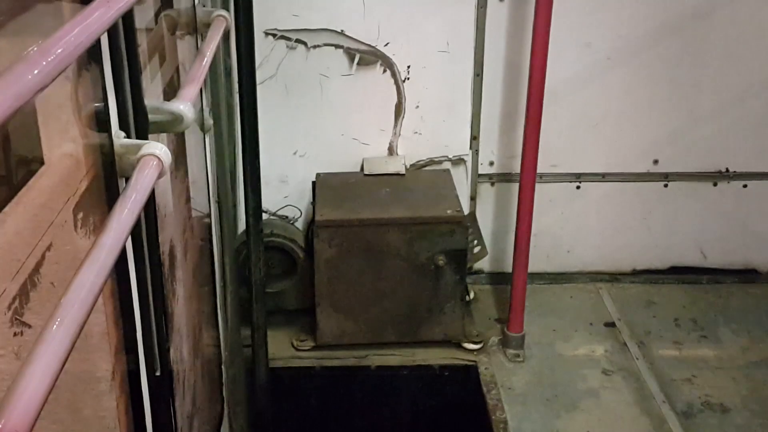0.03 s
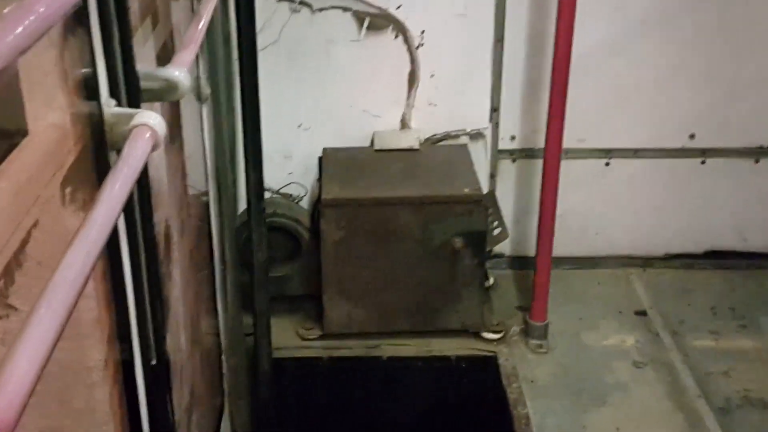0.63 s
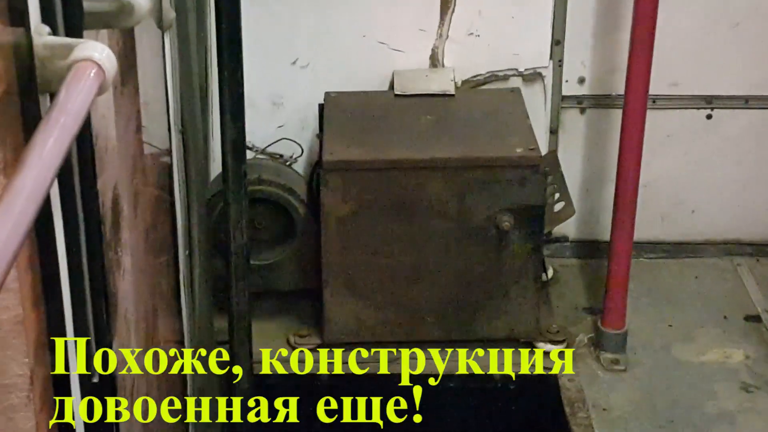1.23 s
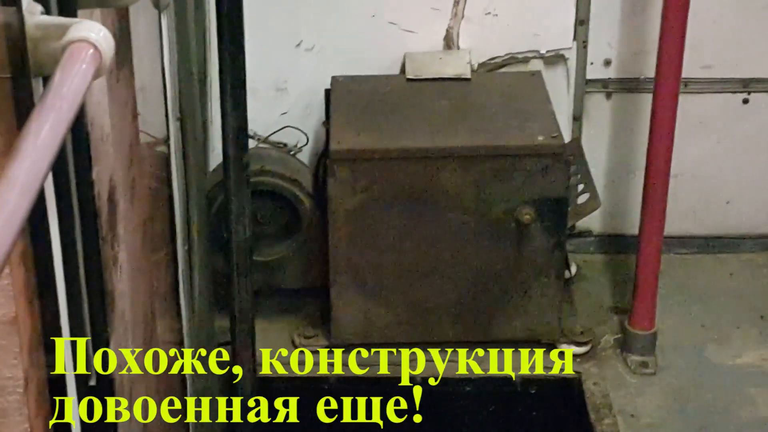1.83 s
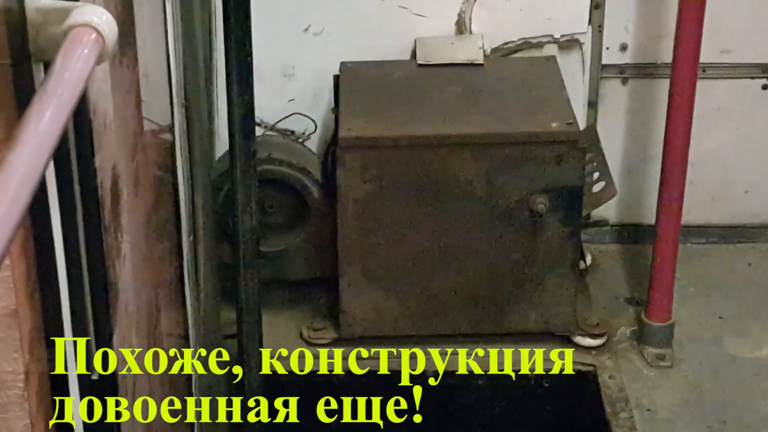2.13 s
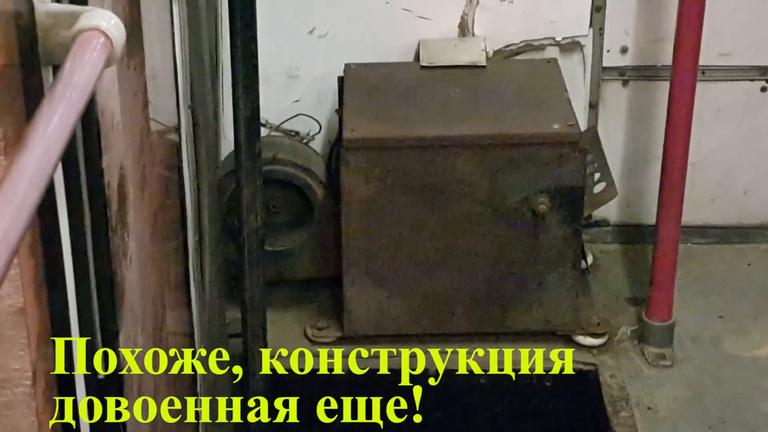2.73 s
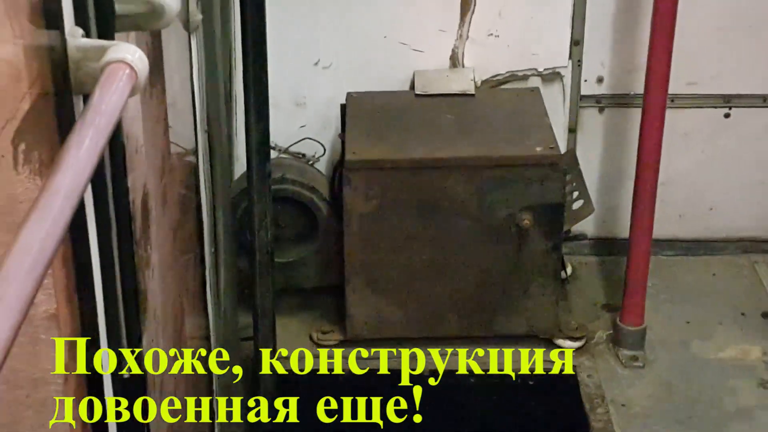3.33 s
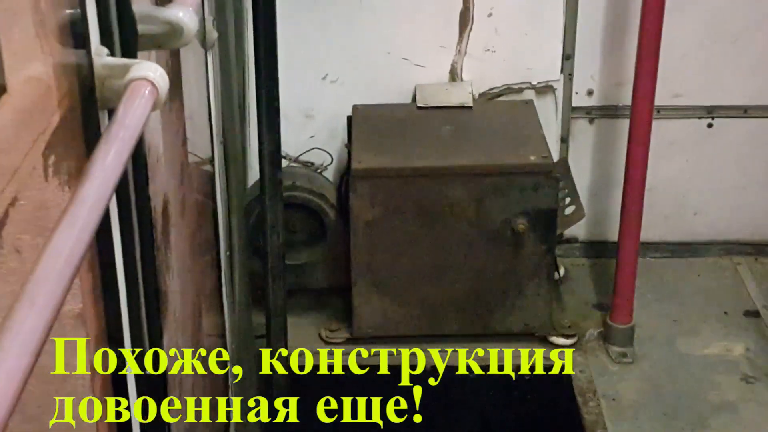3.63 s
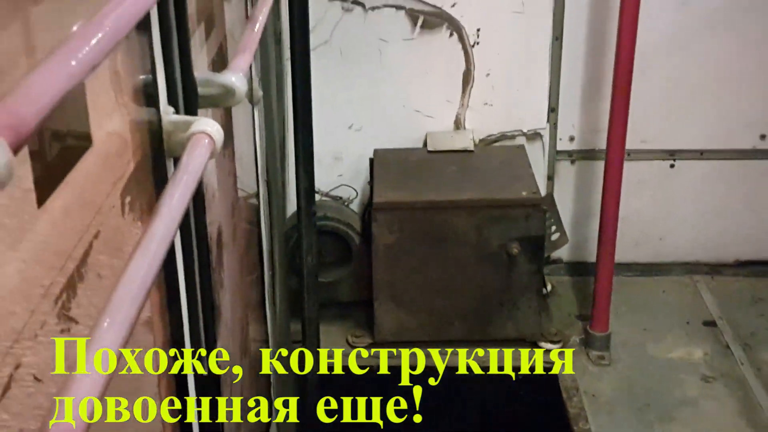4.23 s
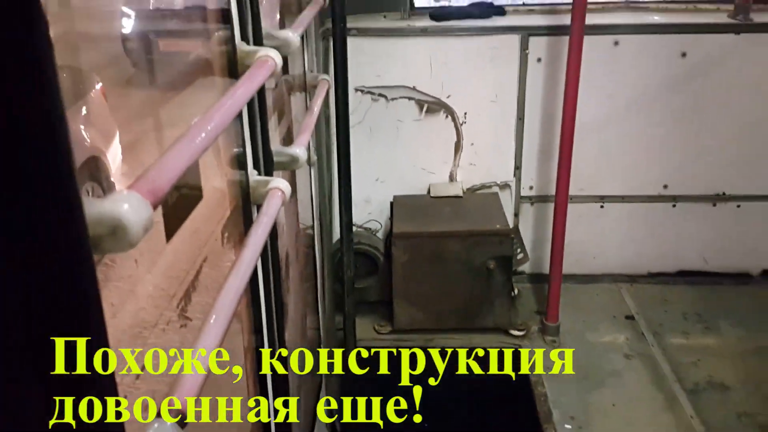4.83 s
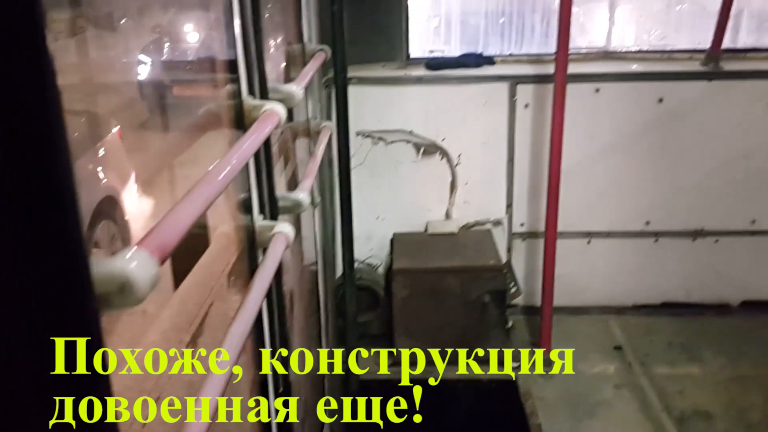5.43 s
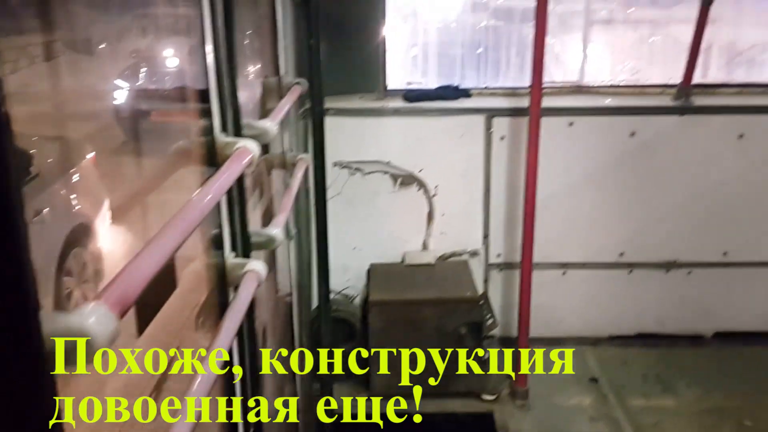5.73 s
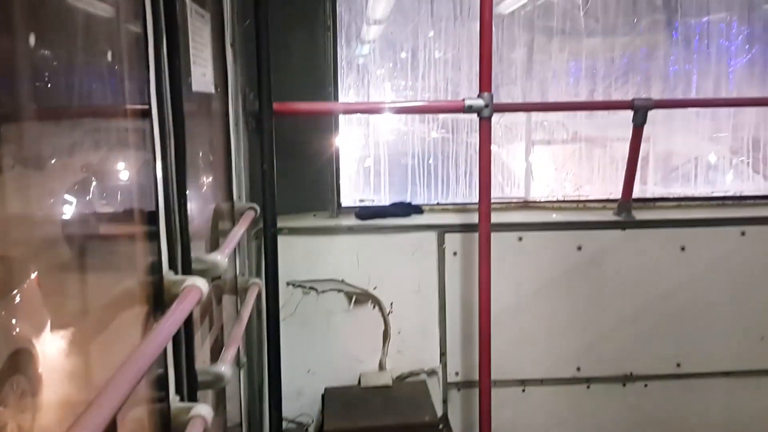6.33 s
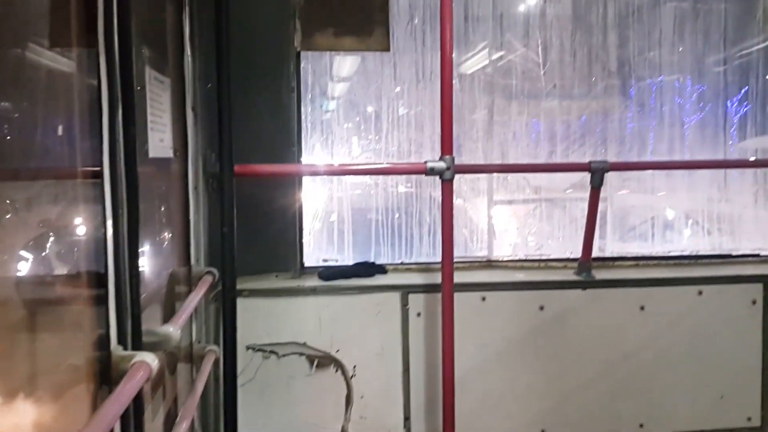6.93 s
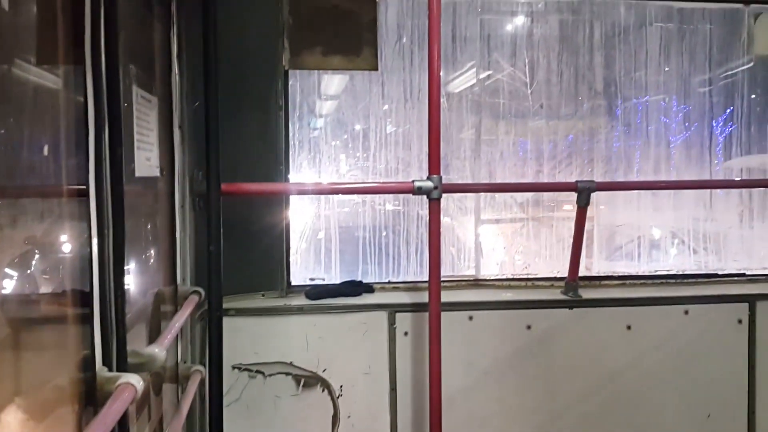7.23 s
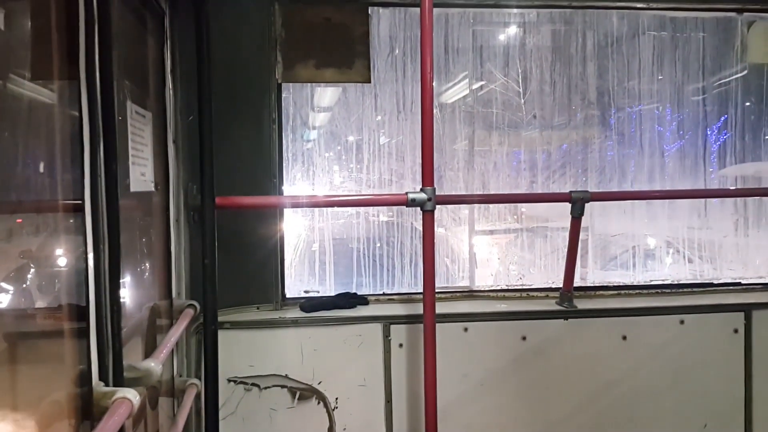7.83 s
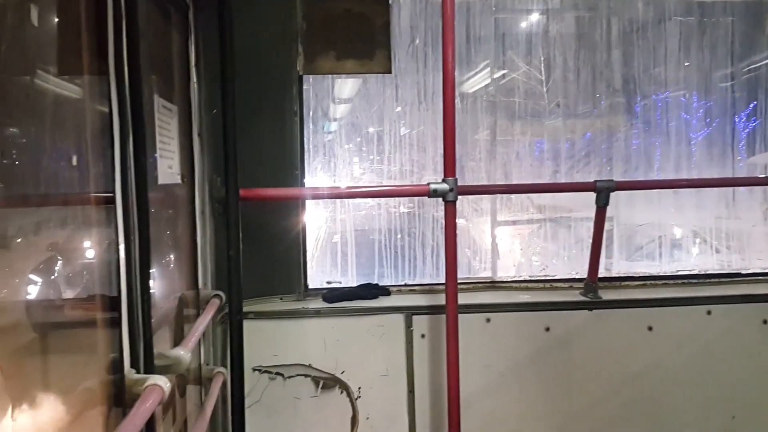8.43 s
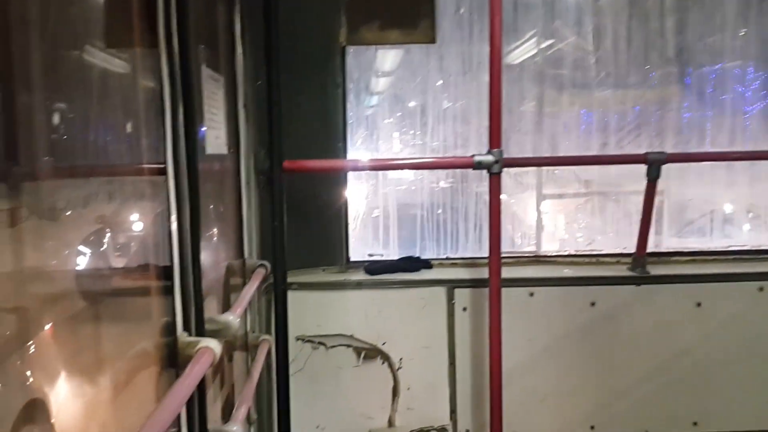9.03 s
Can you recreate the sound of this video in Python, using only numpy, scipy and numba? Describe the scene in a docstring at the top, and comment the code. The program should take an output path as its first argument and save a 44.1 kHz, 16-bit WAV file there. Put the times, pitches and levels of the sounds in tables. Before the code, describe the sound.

A bus idles with a throbbing diesel boom, heard from inside, while a floor heater fan hums and blows air.

```python
"""A throbbing diesel boom fades in: a bus idles, heard from inside, and its uneven firings ring the
exhaust pipe and the cabin air and buzz loose panels. Over the cabin rumble a floor heater runs: its fan
motor hums, whirs once a turn and blows air through a steel box. Loose sheet metal gives a few light
rattles. The hand-held phone turns from heater to window, and its gain control ducks on the throbs."""
import sys
import numpy as np
from scipy import signal
from scipy.fft import rfft, irfft
from scipy.io import wavfile
from scipy.ndimage import uniform_filter1d
from numba import njit

SR = 44100
rng = np.random.default_rng(int(sys.argv[2]) if len(sys.argv) > 2 else 0)


def waveform_to_disk(signal):
    """Save audio, clipped to [-1, 1], as 16-bit WAV at the path in sys.argv[1]."""
    frames = np.transpose(np.atleast_2d(signal))
    scaled = np.clip(frames, -1, 1) * 32767
    samples = np.round(scaled).astype(np.int16)
    wavfile.write(sys.argv[1], SR, samples)


N = 404397
TIME = np.arange(N) / SR
FREQS = np.maximum(np.fft.rfftfreq(N, 1 / SR), 1)

# idle speed: (time [s], four-stroke cycle rate [Hz])
IDLE_SPEED = [(0, 7.148), (2.6, 7.153), (3.6, 7.169), (5.8, 7.153), (7.8, 7.117), (9.17, 7.123)]
# the uneven firings: (place in the cycle [0-1], exhaust strength [dB], knock strength [dB])
CYLINDERS = [(.12, -1.2, -2), (.456, 0, -6), (.668, -1, 1), (.932, -2.5, -2)]
# two close air modes of the cabin: (pitch [Hz], width [Hz], relative level [dB])
AIR_MODES = [(157.6, 9, 0), (176.9, 9, -2.6)]
# the engine rocks on its mounts: (rate [per cycle], swing [dB], place of the crest in the cycle [0-1])
ROCKING = [(1, 1.8, .28), (2, 1.5, .18)]
# the boom eases for a moment: (time [s], half length [s], depth [dB])
BOOM_LULLS = [(.85, 0.33, -3.5), (3.856, 0.32, -4), (6.8, 0.45, -3)]
# body panels rung by the firings: (pitch [Hz], width [Hz], relative level [dB])
PANEL_MODES = [(192.54, 2.14, 5), (228.6, 7.6, 5), (285.5, 18, -4), (531.8, 10.1, 2.5), (553, 7.2, 1)]
# the engine shakes the body: (order [x cycle rate], level [dB])
SHAKE_ORDERS = [(4, -55), (6, -59), (9, -48.5), (10, -38.5), (12, -33), (14, -40.5), (16, -30)]
# fan motor hum: (order [x shaft rate], level [dB])
FAN_ORDERS = [(1, -52), (5, -36), (6, -32.5), (7, -42), (8, -64), (13, -43.5), (14, -46), (28, -64.5),
              (30, -57), (31, -62.5), (36, -49), (56, -54)]
# rushing air: (frequency [Hz], left density [dB/Hz], right density [dB/Hz])
AIR_SPECTRUM = [(60, -96, -93.5), (330, -54, -58.5), (700, -66, -61.5), (900, -61.5, -64.5),
                (1190, -62, -58), (1610, -66, -61.5), (1850, -67.5, -67), (2500, -72, -65.5),
                (3440, -78, -72.5), (4920, -77.5, -78), (5700, -78.5, -76), (6600, -92, -78.5),
                (7700, -91, -91.5), (11000, -95, -92), (15500, -99, -99)]
# resonances and dips of the heater box and its corner:
# (centre [Hz], width [Hz], lift facing the heater [dB], lift facing the window [dB])
BOX_RESONANCES = [(825, 230, -3.5, 2.5), (1160, 120, 1.5, -1), (1350, 200, 1.5, -2.5), (1700, 70, 2, 2),
                  (2262, 88, 6, 2), (2460, 53, -3.5, -1), (3090, 51, -2, 4), (4470, 130, 5, -0.5),
                  (4900, 540, -2.5, -3), (7160, 200, 4, 5.5), (11600, 1400, -1, 2)]
# cabin rumble: (frequency [Hz], density [dB/Hz])
RUMBLE_SPECTRUM = [(15, -76.5), (50, -72), (80, -53.5), (125, -54), (162, -39.5), (205, -42.5), (250, -52),
                   (300, -49.5), (360, -61.5), (430, -57.5), (510, -52), (610, -59), (760, -57),
                   (950, -70.5)]
# tones of the running bus: (pitch [Hz], level [dB], lift facing the window [dB], pitch wander [ratio])
BUS_TONES = [(35.6, -46.5, 0.5, .002), (826, -45.5, 4.5, .0012), (1944, -46.5, -4.5, .003)]
# light rattles of loose sheet metal: (time [s], half length [s], drive [dB], ring pitch [Hz])
RATTLES = [(2.238, 0.021, -34, 4000), (2.662, 0.018, -43, 4020), (2.8, 0.016, -43, 4500),
           (6.439, 0.013, -39, 4580)]
# where the phone points: (time [s], aim [0 heater - 1 window])
PHONE_AIM = [(4.4, 0.2), (6.8, 1)]


def undb(db):
    """Decibels to gain."""
    return 10 ** (np.asarray(db) / 20)


def level(x, db):
    """Scale to an rms level."""
    return x * undb(db) / np.sqrt(np.mean(x ** 2))


def drift(rate_hz):
    """Smooth random movement with a spread of 1."""
    return level(irfft(rfft(rng.standard_normal(N)) * np.exp(-(FREQS / rate_hz) ** 2), N), 0)


def bump(centre_s, half_s):
    """A smooth rise and fall, 1 at its centre."""
    return np.exp(-((TIME - centre_s) / half_s) ** 2)


def ring(x, hz, width_hz):
    """A resonance with gain 1 at its centre."""
    return signal.lfilter(*signal.iirpeak(hz, hz / width_hz, fs=SR), x)


def curve(hz, db):
    """An EQ curve: points joined on a log-frequency axis."""
    return np.interp(np.log(FREQS), np.log(hz), db)


def colour(white, db):
    """Give unit white noise a density in dB per Hz."""
    return irfft(rfft(white) * undb(db), N) * np.sqrt(SR / 2)


def tone(turns, hz, db, diffuse_hz=1100):
    """A stereo sine whose phase spreads wider with pitch, up to diffuse_hz."""
    apart = min(hz / diffuse_hz, 1) ** 2 * rng.choice([-1, 1]) * np.pi / 4
    phase = 2 * np.pi * (turns + rng.random())
    return undb(db) * np.sqrt(2) * np.sin(phase + np.array([[apart], [-apart]]))


def pan(x, db):
    """Lean to the left by db."""
    return x * undb(np.array([[db], [-db]]) / 2)


def firings(cycle, strength_db, scatter_db, jitter_s):
    """One pulse per cylinder per cycle, each a little off in strength and time."""
    place = np.array(CYLINDERS)[:, 0]
    cycles = np.arange(int(cycle[-1]) + 1)
    chance = rng.standard_normal((len(cycles) * len(place), 2))
    due_s = np.interp((cycles[:, None] + place).ravel(), cycle, TIME, right=2 * TIME[-1])
    fired_s = due_s + jitter_s * chance[:, 0]
    strength = undb(np.tile(strength_db, len(cycles)) + scatter_db * chance[:, 1])
    return np.bincount(np.abs(fired_s * SR).astype(int), strength, N)[:N]


def boom(pulses, cycle, aim, base_db=-13, window_db=-1.5):
    """Exhaust pulses ring the pipe and the cabin air; the level throbs as the engine rocks."""
    pipe = ring(pulses, hz=163, width_hz=27)
    # each firing adds to or cancels what still rings, so the boom swells once a cycle
    cabin_air = sum(undb(db) * ring(pipe, hz, width) for hz, width, db in AIR_MODES)
    throb_db = sum(db * np.cos(2 * np.pi * order * (cycle - crest)) for order, db, crest in ROCKING)
    lull_db = sum(db * bump(s, half) for s, half, db in BOOM_LULLS)
    return level(cabin_air, base_db) * undb(window_db * aim + throb_db + lull_db - 0.04 * drift(1.2))


def panel_buzz(knocks):
    """Engine knock sets the body panels ringing."""
    modes = sum(undb(db) * ring(ring(knocks, hz, width), hz, 5 * width) for hz, width, db in PANEL_MODES)
    return level(modes, -25.5)


def body_shake(cycle, thump_place=0.4826):
    """The crankshaft shakes the body; its even orders fall into step once a crank turn, a soft thump."""
    phase = 2 * np.pi * (cycle - thump_place)
    orders = sum(undb(db + 0.61 * drift(0.89)) * np.cos(order * phase) for order, db in SHAKE_ORDERS)
    return np.sqrt(2) * orders


def engine(aim):
    """The idling diesel: boom, buzz and shake, all locked to one four-stroke cycle."""
    cycle = np.cumsum(np.interp(TIME, *np.transpose(IDLE_SPEED))) / SR
    _, exhaust_db, knock_db = np.transpose(CYLINDERS)
    pulses = firings(cycle, exhaust_db, scatter_db=2.6, jitter_s=0.00024)
    low_boom = boom(pulses, cycle, aim)
    knocks = firings(cycle, knock_db, scatter_db=2.5, jitter_s=0.00028)
    return pan(low_boom, 1) + pan(panel_buzz(knocks), -.5) + body_shake(cycle)


def standing_waves(spacing_hz, depth_db):
    """The cabin's steady ripple of peaks and dips in dB, different at each microphone."""
    ripple = rng.standard_normal((2, N // 100))
    return depth_db * np.array([np.interp(FREQS / spacing_hz, np.arange(len(r)), r) for r in ripple])


def heater_box(air, aim):
    """Steel box and cabin colour the airflow; turning the phone crossfades the resonances."""
    hz, left_db, right_db = np.transpose(AIR_SPECTRUM)
    air_db = np.array([curve(hz, left_db), curve(hz, right_db)])
    air_db += standing_waves(spacing_hz=21.99, depth_db=2.07)
    centre, width, heater_db, window_db = np.transpose(BOX_RESONANCES)
    peaks = 1 / (1 + (2 * (FREQS[:, None] - centre) / width) ** 2)
    facing_heater = colour(air, air_db + peaks @ heater_db)
    facing_window = colour(air, air_db + peaks @ window_db)
    return (1 - aim) * facing_heater + aim * facing_window


def heater_fan(aim, shaft_hz=44.77, whir_db=-15):
    """The motor hums and drives fluttering air that partly repeats on each turn."""
    turns = np.cumsum(shaft_hz * (1 + 0.001217 * drift(1.48))) / SR
    hum = sum(tone(order * turns, order * shaft_hz, db + 2 * drift(7.7)) for order, db in FAN_ORDERS)
    # brushes and bearings rub over the same surface on every turn
    surface = rng.standard_normal((2, int(SR / shaft_hz)))
    whir = surface[:, (turns % 1 * surface.shape[1]).astype(int)]
    air = level(rng.standard_normal((2, N)) + undb(whir_db) * whir, 0)
    flutter_db = .35 * np.sin(2 * np.pi * turns) + .25 * np.sin(2 * np.pi * 3 * turns)
    air *= undb(flutter_db + 0.28 * drift(60) + 0.14 * drift(24))
    return pan(hum, -1) + heater_box(air, aim)


def cabin_rumble(diffuse_hz=320, side_db=-10, rolloff_hz=1300):
    """A dark bed of noise, near mono in the bass and wider above."""
    mid_db = curve(*np.transpose(RUMBLE_SPECTRUM)) - 20 * np.log10(1 + (FREQS / rolloff_hz) ** 4)
    width_db = side_db + 40 * np.log10(np.minimum(FREQS / diffuse_hz, 1))
    mid = colour(rng.standard_normal(N), mid_db)
    side = colour(rng.standard_normal(N), mid_db + width_db)
    return pan(np.array([mid + side, mid - side]), -2.45)


def bus_tones(aim):
    """A low drone and two thin whines of the running bus waver in pitch and level."""
    out = 0
    for hz, db, window_db, wander in BUS_TONES:
        turns = np.cumsum(hz * (1 + wander * drift(5.76))) / SR
        out += tone(turns, hz, db + aim * window_db + 0.89 * drift(4))
    return out


def rattles(decay_s=0.087, rub_gain_db=11.5, tail_gain_db=22, scrape_gain_db=4):
    """Loose sheet metal rubs: a short gritty scrape, and a thin ring that outlasts it."""
    grit = ring(rng.standard_normal((2, N)), hz=4300, width_hz=3500)
    out = 0
    for s, half, db, hz in RATTLES:
        swell = undb(db) * bump(s, half)
        tail = signal.lfilter([1 / (decay_s * SR)], [1, -np.exp(-1 / (decay_s * SR))], swell)
        drive = undb(rub_gain_db) * swell + undb(tail_gain_db) * tail
        metal = ring(grit * drive + 1e-18, hz, width_hz=270)
        scrape = ring(grit * swell + 1e-18, hz=5200, width_hz=2500)
        out += metal + undb(scrape_gain_db) * scrape
    return out


def scene():
    """The stereo mix inside the bus as the phone turns towards the window."""
    aim = np.clip(np.interp(TIME, *np.transpose(PHONE_AIM)), 0, 1)
    return engine(aim) + heater_fan(aim) + cabin_rumble() + bus_tones(aim) + rattles()


@njit
def follow(x, attack, release):
    """Peak follower with a quick rise and a slower fall."""
    out, envelope = np.empty(len(x)), 0.
    for i in range(len(x)):
        envelope += (x[i] - envelope) * (attack if x[i] > envelope else release)
        out[i] = envelope
    return out


def record(dry, knee_db=-10, squeeze=0.44, makeup_db=1, attack_s=0.00053, release_s=0.024,
           start_s=0.38, fade_s=0.3, top_hz=15500):
    """The phone fades in, ducks the loudest throbs and cuts the top."""
    peak = follow(np.abs(dry).max(axis=0), 1 / (attack_s * SR), 1 / (release_s * SR))
    duck = np.minimum(undb(knee_db) / (peak + 1e-9), 1) ** squeeze
    gain = uniform_filter1d(duck, size=512) * undb(makeup_db)
    fade_in = np.clip((TIME - start_s) / fade_s, 0, 1)
    fade_out = np.minimum((TIME[-1] - TIME) / .004, 1)
    high_cut = signal.ellip(10, .1, 80, top_hz, fs=SR, output="sos")
    return signal.sosfilt(high_cut, dry * gain * fade_in * fade_out)


dry = scene()
out = record(dry)
waveform_to_disk(out)
```